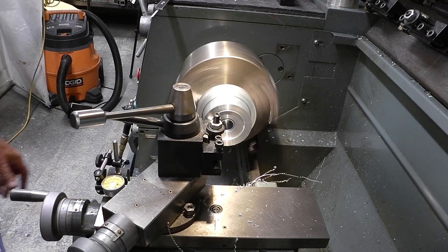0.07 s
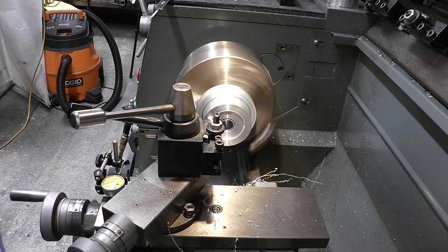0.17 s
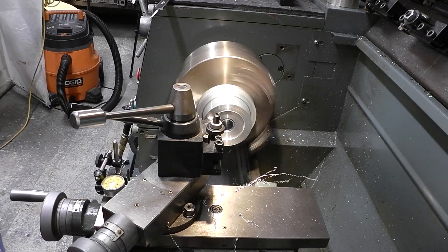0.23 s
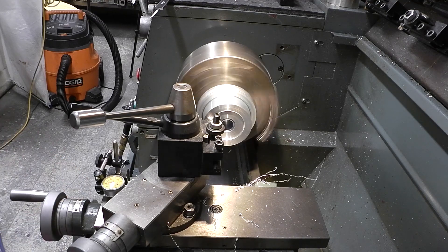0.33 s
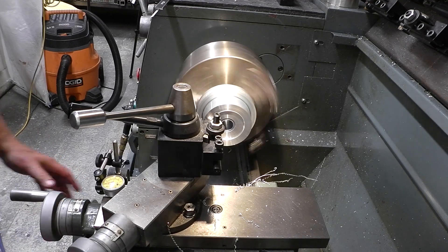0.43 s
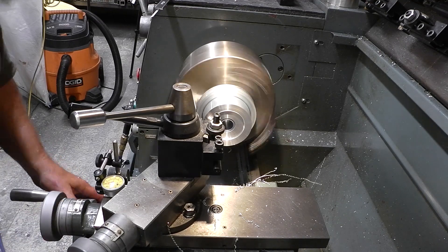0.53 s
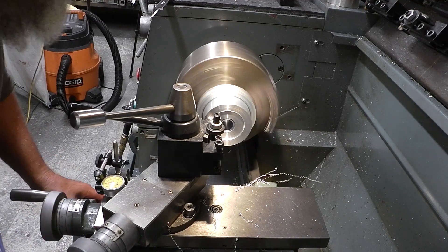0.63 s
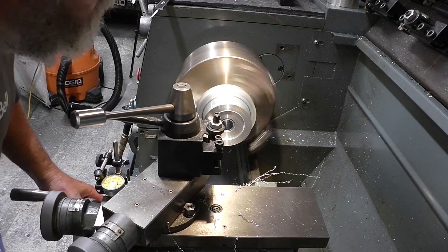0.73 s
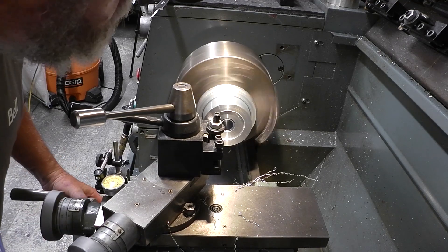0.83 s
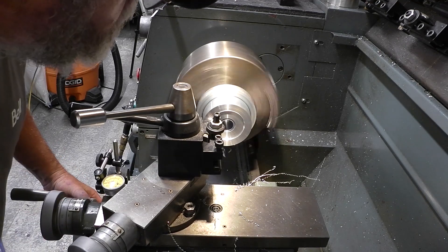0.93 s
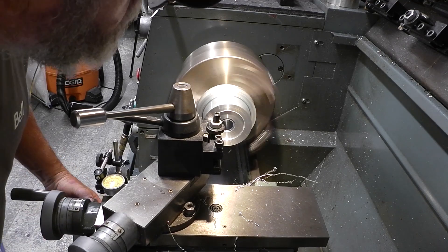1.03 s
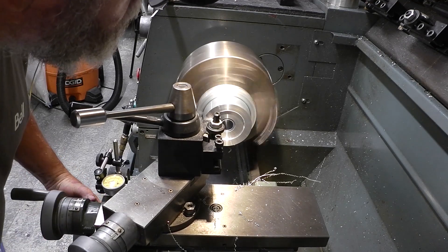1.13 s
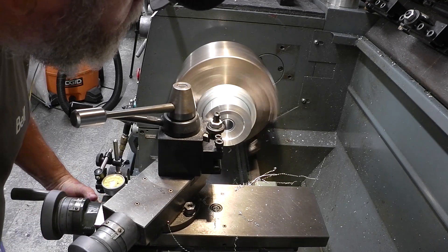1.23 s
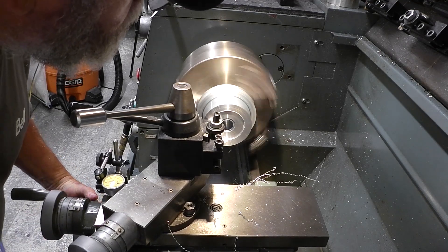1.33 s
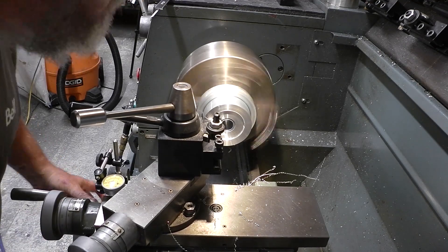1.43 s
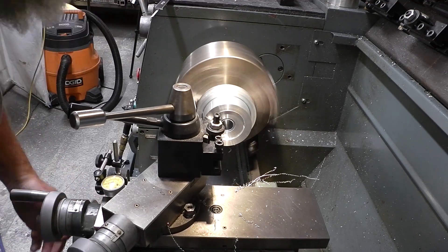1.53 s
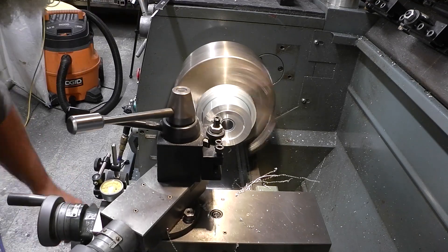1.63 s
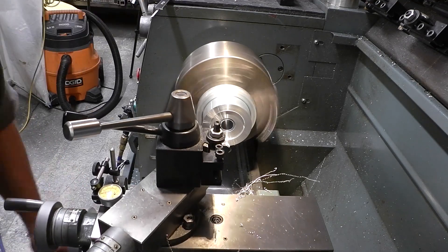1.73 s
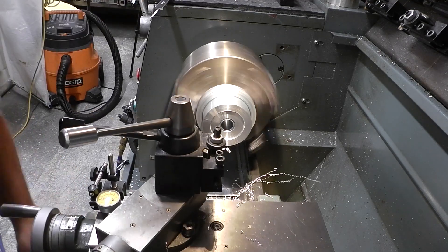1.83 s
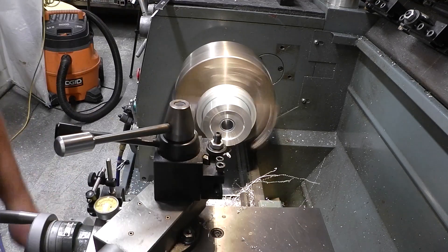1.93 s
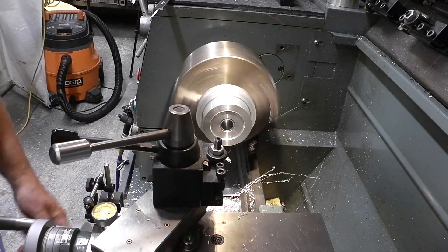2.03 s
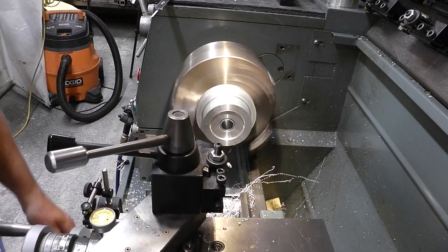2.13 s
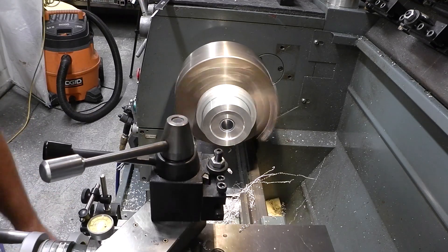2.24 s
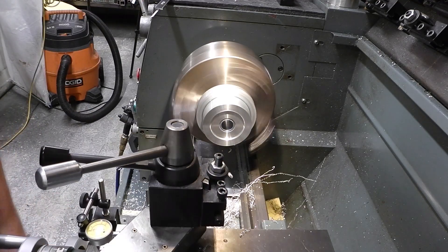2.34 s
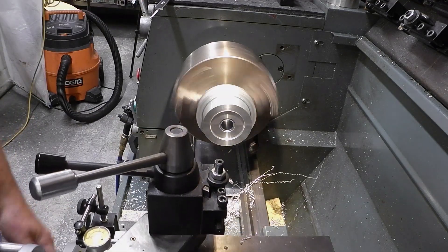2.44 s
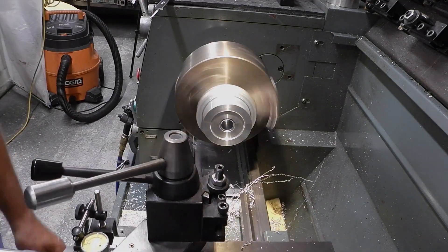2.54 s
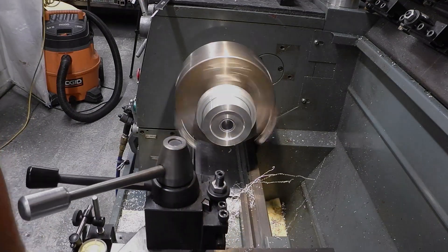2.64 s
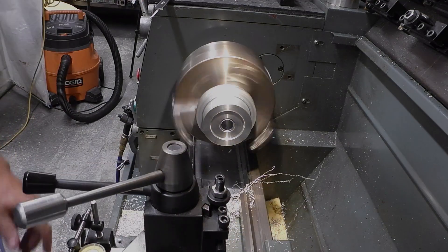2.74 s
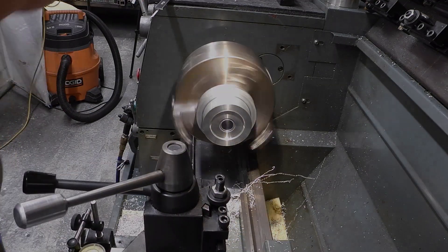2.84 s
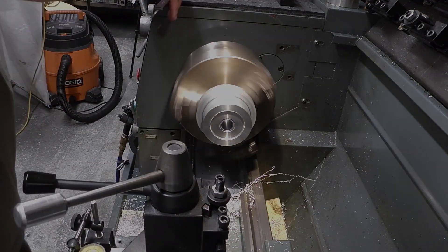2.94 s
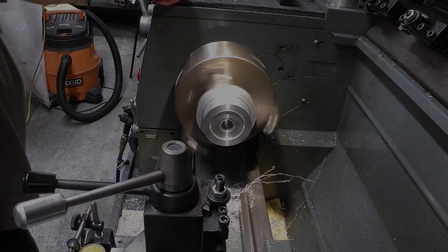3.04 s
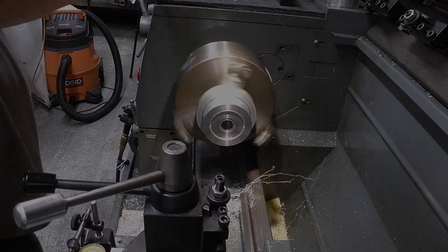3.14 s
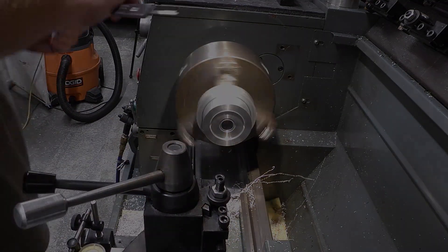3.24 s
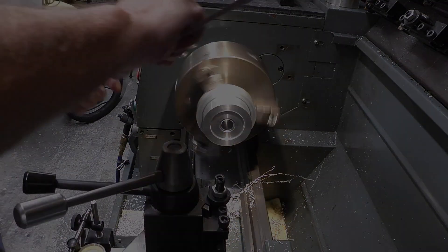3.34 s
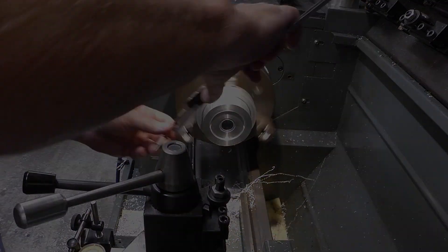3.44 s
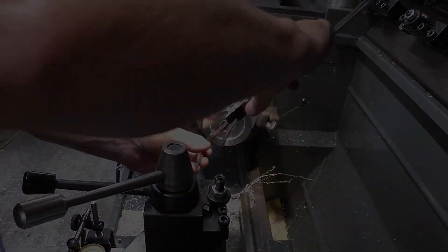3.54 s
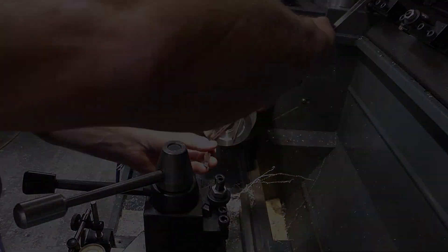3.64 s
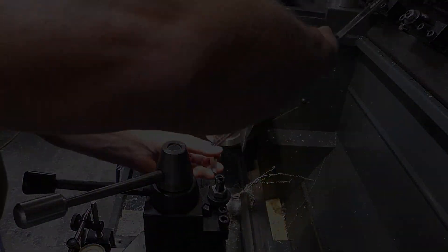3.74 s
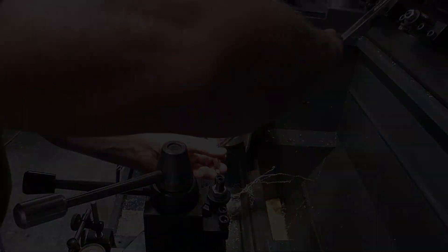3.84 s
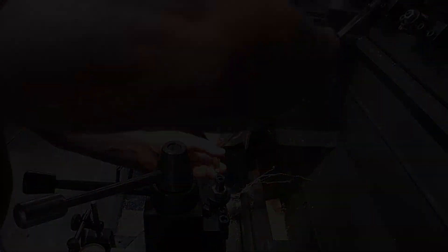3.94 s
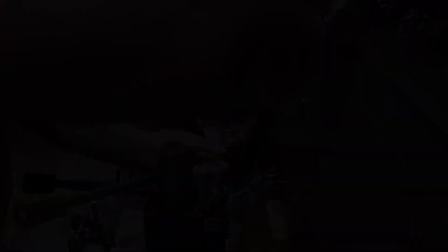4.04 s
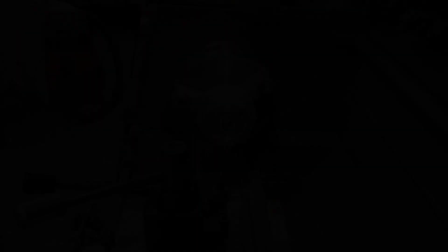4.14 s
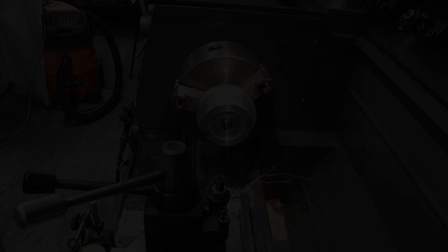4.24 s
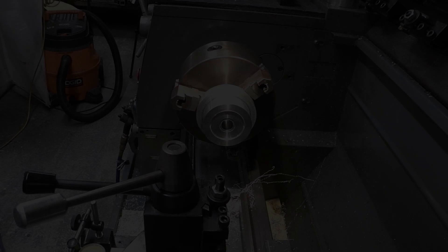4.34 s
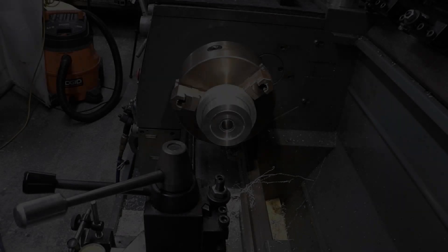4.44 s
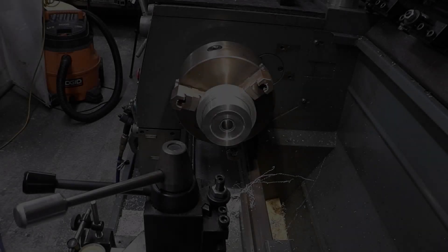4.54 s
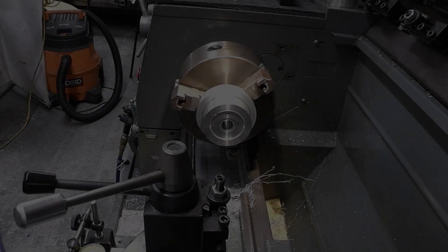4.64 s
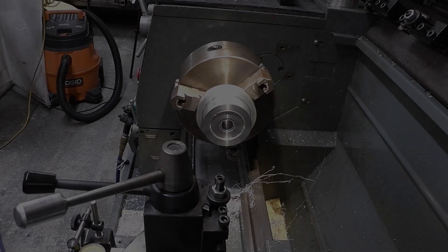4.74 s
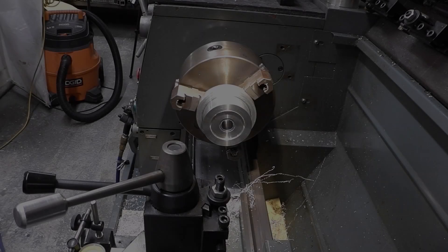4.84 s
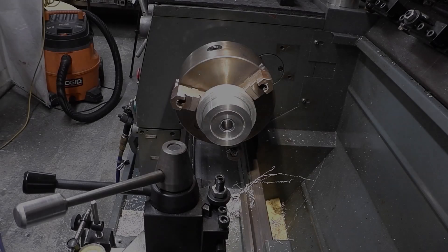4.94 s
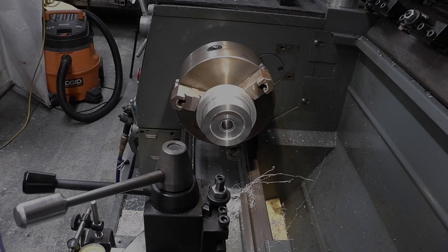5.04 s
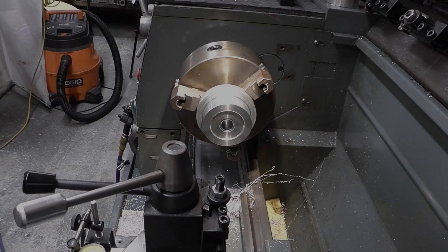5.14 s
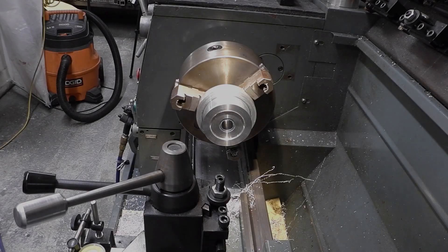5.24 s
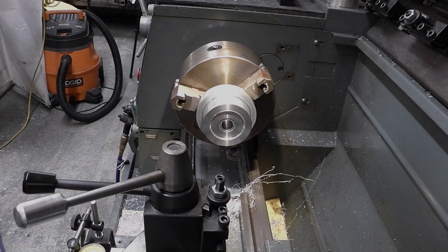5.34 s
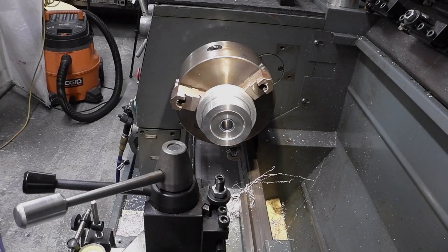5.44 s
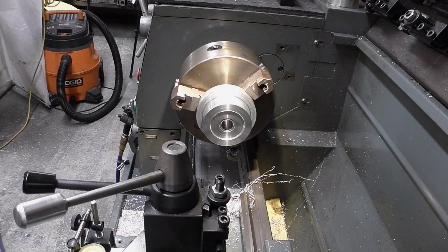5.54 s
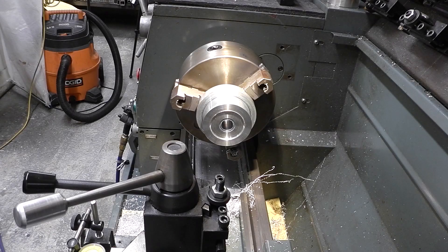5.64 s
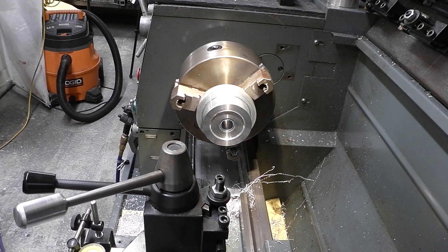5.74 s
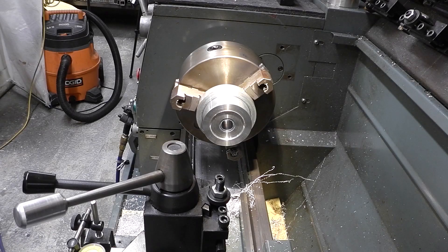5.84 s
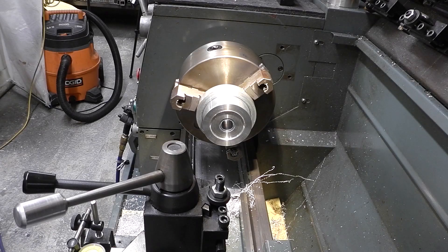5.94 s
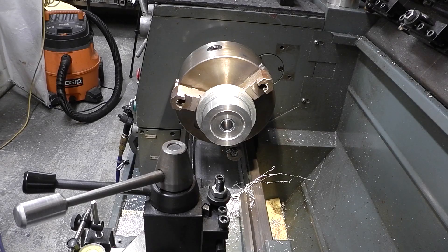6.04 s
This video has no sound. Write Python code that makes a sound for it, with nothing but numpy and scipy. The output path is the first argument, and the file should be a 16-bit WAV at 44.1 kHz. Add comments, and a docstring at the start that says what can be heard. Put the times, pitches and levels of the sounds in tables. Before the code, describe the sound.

Lathe spindle rumbles, controls click, the feed clunks in, then steady hissing, whining cutting of aluminium fades out; steel parts clink and knock in a quiet shop.

```python
"""A boring bar cuts aluminium on a lathe: uneven slips of the chip hiss through the bar's resonances,
and wavering tones whine over the hiss. Before the cut, the spindle rumbles as filtered noise, a handle rubs,
controls click, and the feed engages with a clunk and a rising whirr. The lathe then fades away.
A quiet workshop of noise and mains hum fades in, and steel parts knock with clinks and heavy thuds."""
import sys
import numpy as np
from scipy import signal
from scipy.fft import rfft, irfft, next_fast_len
from scipy.io import wavfile
from scipy.ndimage import map_coordinates

SR = 44100
rng = np.random.default_rng(int(sys.argv[2]) if len(sys.argv) > 2 else 0)


def transcribe(u):
    """Save the signal u as a 16-bit wav file named by the first command-line argument.

    u: samples, shape (n,) or (channels, n), limited to [-1, 1]; the rate is SR.
    q: integer samples, one column per channel.
    """
    v = np.clip(np.atleast_2d(u).T, -1, 1)
    q = np.round(v * 32767).astype(np.int16)
    wavfile.write(sys.argv[1], SR, q)


N = 268693
TIME = np.arange(N) / SR  # seconds
ENGAGE_S = 0.563  # the feed engages


def amp(db):
    """Turns decibels into a gain."""
    return 10 ** (np.asarray(db) / 20)


def unit(x):
    """Scales a sound to an rms of 1."""
    return x / np.sqrt(np.mean(x ** 2) + 1e-20)


def along(points, hz):
    """Reads a curve of (pitch_hz, value) points, joined on a log pitch axis."""
    f, v = np.transpose(points)
    return np.interp(np.log(hz + 1), np.log(f + 1), v)


def over_time(points):
    """Reads a curve of (time_s, value) points at every sample."""
    s, v = np.transpose(points)
    return np.interp(TIME, s, v)


def ramp(start, length):
    """Rises from 0 to 1 over length seconds, then holds."""
    return np.clip((TIME - start) / length, 0, 1)


def wobble(rate):
    """A smooth random curve through rate new values a second."""
    knots = rng.standard_normal(int(N * rate / SR) + 4)
    return map_coordinates(knots, [TIME * rate])


def ripple(hz, spacing_hz):
    """Random peaks and notches along frequency, as closely spaced resonances give."""
    return map_coordinates(rng.standard_normal(1024), [hz / spacing_hz], mode="mirror")


def noise(colour_db, alike, size=N):
    """Stereo noise of rms 1, coloured by a function of frequency; alike sets how much left matches right."""
    m = next_fast_len(size)
    hz = np.fft.rfftfreq(m, 1 / SR)
    # share the noise between the middle and the sides to get the wanted likeness
    turn = np.arccos(np.clip(along(alike, hz), -1, 1)) / 2
    spectra = rfft(rng.standard_normal((2, m))) * amp(colour_db(hz))
    mid, side = irfft(spectra * [np.cos(turn), np.sin(turn)], m)[:, :size]
    return unit(np.array([mid + side, mid - side]))


def rush(spectrum, alike, size=N):
    """Stereo noise of rms 1, coloured by a table of frequencies and dB."""
    return noise(lambda hz: along(spectrum, hz), alike, size)


def tones(lines, flutter, drift, rate):
    """Adds steady tones, each wavering in strength (flutter) and phase (drift, radians) on its own."""
    knots = np.arange(int(N * rate / SR) + 2) / rate

    def waver():
        return np.interp(TIME, knots, rng.standard_normal(len(knots)))

    total = np.zeros(N)
    for hz, db in lines:
        strength = 1 + flutter * waver()
        wave = np.sin(2 * np.pi * hz * TIME + drift * waver())
        total += amp(db) * unit(strength * wave)
    return total


def blow(rise, t60):
    """One second of loudness shape: a smooth rise to 1, then a fall of 60 dB every t60 seconds."""
    t = TIME[:SR]
    attack = np.sin(np.pi / 2 * np.minimum(t / rise, 1)) ** 2
    return attack * amp(-60 * np.maximum(t - rise, 0) / t60)


def ring(modes, rise, scatter_db):
    """Adds dying tones, as struck metal rings, with new random strengths for each blow."""
    total = np.zeros(SR)
    for hz, db, t60 in modes:
        strength = amp(db + scatter_db * rng.normal())
        wave = np.sqrt(2) * np.sin(2 * np.pi * (hz * TIME[:SR] + rng.random()))
        total += strength * blow(rise, t60) * wave
    return total


def damped(x, treble_loss):
    """A ring whose treble dies first; treble_loss is the extra dB a second at 10 kHz."""
    hz, t, z = signal.stft(x, SR, nperseg=128)
    loss_db = treble_loss * t * (hz[:, None] / 1e4) ** 2
    return signal.istft(z * amp(-loss_db), SR, nperseg=128)[1]


def add(track, s, sound):
    """Mixes a sound into the track at s seconds."""
    part = track[:, round(s * SR):][:, :sound.shape[-1]]
    part += sound[..., :part.shape[-1]]


# colour of the quiet workshop: pitch_hz, strength_db (per Hz, relative)
SHOP_COLOUR = [(30, -11), (55, -4), (85, -6.5), (115, 5), (155, -9), (200, 0), (260, -9), (500, -12),
               (1300, -15.5), (2000, -16.5), (6500, -19), (11000, -24), (15000, -31)]
# the mains hum: pitch_hz, level_db (rms)
MAINS_HUM = [(100, -78), (199, -74.5)]
# how alike left and right are in the shop, also for the jolt and knocks: pitch_hz, likeness (1 = same)
SHOP_LIKENESS = [(120, 0.9), (300, 0.82), (1000, .95), (2200, 0.91), (4200, 0.79), (7500, 0.43),
                 (11000, -0.13)]


def workshop(level_db=-64):
    """Room rumble as uneven noise, with a mains hum that comes and goes."""
    hum = unit(amp(3 * wobble(11))) * tones(MAINS_HUM, flutter=0.6, drift=0.9, rate=18)
    return amp(level_db + 0.67 * wobble(8.7)) * rush(SHOP_COLOUR, SHOP_LIKENESS) + hum


# steel parts knock on the machine: start_s, level_db, clink_db and thud_db (both relative to level_db),
# contact_s (how long the touch lasts), tilt_db (treble per octave)
KNOCK_LIST = [(4.475, -70, -7, -24, .014, 2), (4.634, -59, -7, -26.5, 0.027, 2),
              (4.913, -64, 2.5, -23, 0.0016, 0.5), (4.933, -59.5, 3, -31.5, 0.0047, 11),
              (4.939, -53, 5, -27, 0.00071, -2), (5.053, -38.5, 4.5, -26, .007, 1),
              (5.238, -45.5, 5.5, -6, 0.0093, -1.5), (5.285, -36, 6, -9.5, .004, 12.5),
              (5.325, -35.5, -1, -6, .01, 10.5), (5.380, -46, 3.5, -4, .012, 5.5),
              (5.666, -57.5, -9.5, -9, .0008, -10), (5.742, -59.5, -4, -17, 0.006, -3),
              (5.836, -57, -3, -18, .022, -5)]
# the bright ring of a part: pitch_hz, strength_db (per Hz, relative)
CLINK_COLOUR = [(2500, -24), (3700, -11), (4400, 0), (5050, 0.5), (5600, -1.5), (6400, 0), (7200, -1.5),
                (7700, -1), (8800, -1), (9800, -3.5), (11000, -3), (13000, -10.5), (15800, -14.5)]
# the slower answer of the machine's casing: pitch_hz, strength_db (per Hz, relative)
CASING_COLOUR = [(300, -23), (570, -7.5), (900, 0.5), (1400, 3), (1700, 3.5), (2100, -0.5), (2500, 2),
                 (3100, -4.5), (3800, -1), (4300, -14.5), (7000, -26)]
# the heavy bed and chip pan: pitch_hz, strength_db (per Hz, relative)
THUD_COLOUR = [(50, -44), (110, -11.5), (170, -26), (260, -8.5), (330, -4), (480, -1), (700, -5),
               (1200, -4), (2500, -27.5)]
# tones the machine rings with, before tilt and scatter: pitch_hz, level_db (relative to the thud), t60_s
MACHINE_MODES = [(310, -10, .45), (340, -12, .45), (372, -11, .45), (478, -15, .5), (900, -14, .35),
                 (958, -7, .36), (2223, -12, .35), (3690, -11, .28), (3788, -9, .28)]
CLINK_T60_S, CASING_T60_S, FULL_BLOW_DB = 0.54, 0.56, -40.5  # ring times after a full blow of this level
CLINK_HALVING_DB, CASING_HALVING_DB = 46, 71  # a blow lighter by this much rings half as long
GLANCE_S = 0.0045  # touches briefer than this only glance off and ring shorter


def knocks(casing_lag=0.018, thud_lag=0.026, ripple_db=3):
    """Bending waves run faster when high: the clink comes first, the casing and the bed follow."""
    out = np.zeros((2, N))

    def octaves(hz):
        return np.log2(np.clip(hz, 600, 4500) / 600)

    for s, db, clink_db, thud_db, rise, tilt_db in KNOCK_LIST:
        firmness = min(rise / GLANCE_S, 1)
        force_db = db - FULL_BLOW_DB
        clink_t60 = CLINK_T60_S * firmness * 2 ** (force_db / CLINK_HALVING_DB)
        casing_t60 = CASING_T60_S * firmness ** 0.13 * 2 ** (force_db / CASING_HALVING_DB)

        # each point of contact favours other resonances
        def clink_colour(hz):
            return along(CLINK_COLOUR, hz) + ripple_db * ripple(hz, spacing_hz=170.1)

        clink = blow(rise, clink_t60) * noise(clink_colour, SHOP_LIKENESS, size=SR)
        add(out, s, amp(db + clink_db) * damped(clink, treble_loss=18))

        # the tilt makes the casing brighter or darker
        def casing_colour(hz):
            return along(CASING_COLOUR, hz) + tilt_db * octaves(hz) + ripple_db * ripple(hz, spacing_hz=90.2)

        casing = blow(rise * 1.48, casing_t60) * noise(casing_colour, SHOP_LIKENESS, size=SR)
        add(out, s + casing_lag, amp(db) * casing)

        # a downward tilt also weakens the high modes
        modes = [(hz, level + min(tilt_db, 0) * octaves(hz), t60) for hz, level, t60 in MACHINE_MODES]
        bed = blow(rise + 0.022, casing_t60) * rush(THUD_COLOUR, SHOP_LIKENESS, size=SR)
        add(out, s + thud_lag, amp(db + thud_db) * (bed + ring(modes, rise=0.017, scatter_db=6.0)))
    # loose parts chatter as they ring
    return out * amp(0.43 * wobble(280))


# colour of the free-running spindle: pitch_hz, strength_db (per Hz, relative)
SPINDLE_COLOUR = [(30, -22), (100, -12.5), (170, -2.5), (250, -1), (350, 7.5), (480, -6.5), (640, 0),
                  (900, -14), (1900, -8), (3400, -16.5), (6000, -20.5), (10000, -17), (15000, -19)]
# the spindle's level before its unevenness: time_s, level_db
SPINDLE_LEVEL = [(0, -70), (.5, -64), (1, -67)]
# how alike left and right are for spindle, controls and cut: pitch_hz, likeness (1 = same)
LATHE_LIKENESS = [(120, 0.34), (260, 0.68), (500, 0.84), (1000, 0.81), (2000, 0.89), (4200, 0.93),
                  (7500, 0.9), (12000, 0.77)]


def spindle():
    """Bearings and belt rumble unevenly, as coloured noise of wavering level."""
    level_db = over_time(SPINDLE_LEVEL) + 1.2 * wobble(12)
    return amp(level_db) * rush(SPINDLE_COLOUR, LATHE_LIKENESS)


# colour of the steel controls, for the rub and the clicks: pitch_hz, strength_db (per Hz, relative)
STEEL_COLOUR = [(400, -14), (900, -5), (2300, -4), (3300, -6.5), (4500, -3.5), (6500, -5.5), (7900, 5),
                (9300, -1.5), (10500, -2.5), (13000, -7), (15800, -5.5)]
SLIDE_S, SLIDE_HOLD_S, SLIDE_DB = 0.18, 0.059, -54  # start, time until the decay begins, level
SLIDE_RISE_S, SLIDE_T60_S = 0.018, 0.25


def slide(grain_db=2):
    """A handle rubs briefly in fine slips as it is gripped, through the same steel as the clicks."""
    release = amp(-60 * np.maximum(TIME - SLIDE_S - SLIDE_HOLD_S, 0) / SLIDE_T60_S)
    slips = unit(amp(grain_db * wobble(430)) * rush(STEEL_COLOUR, LATHE_LIKENESS))
    return amp(SLIDE_DB) * ramp(SLIDE_S, SLIDE_RISE_S) * release * slips


# light clicks at the controls, the last ones as the feed lever closes: start_s, level_db, t60_s
CONTROL_CLICKS = [(.069, -55.5, .04), (.091, -53.5, 0.021), (0.13, -62, 0.023), (.219, -45.5, 0.018),
                  (.237, -49.5, .05), (.321, -56, .016), (.327, -50.5, 0.047), (.402, -46, 0.0099),
                  (0.408, -46, 0.059), (.478, -57.5, .04), (.525, -48, 0.026), (0.557, -47.5, 0.24),
                  (.567, -34.5, 0.046)]


def controls(echo_db=-17, echo_t60=0.12, ripple_db=3):
    """Small steel contacts, each with its own resonances and a short answer from the room."""
    out = np.zeros((2, N))

    def steel_colour(hz):
        return along(STEEL_COLOUR, hz) + ripple_db * ripple(hz, spacing_hz=360)

    for s, db, t60 in CONTROL_CLICKS:
        echo = amp(echo_db) * blow(0.016, echo_t60)
        shape = np.hypot(blow(0.0015, t60), echo)  # the click rises in 1.5 ms
        add(out, s, amp(db) * shape * noise(steel_colour, LATHE_LIKENESS, size=SR))
    return out


# the carriage jolts as the feed takes up, band by band: delay_s, pitch_hz, width_hz, level_db, t60_s
JOLT_BANDS = [(0.011, 260, 130, -51, 0.18), (0.0031, 700, 300, -45.5, 0.15), (0.0071, 1690, 790, -42, 0.19),
              (0.022, 2900, 1200, -40.5, 0.22)]
# tones the bar rings with as it enters the cut, before scatter: pitch_hz, level_db, t60_s
ENTRY_MODES = [(3685, -32, .075), (2920, -42, .15)]
MESH_START_HZ, MESH_CLIMB_HZ_PER_S, MESH_TOP_HZ = 400, 5400, 1720  # gear mesh as the drive gathers speed
WHIRR_DB, WHIRR_PEAK_S, WHIRR_WIDTH_S = -50, 0.742, 0.067  # loudest part of the way up


def engage():
    """The carriage jolts, the bar rings as it meets the metal, and the gears whirr up to speed."""
    out = np.zeros((2, N))
    for delay, centre, width, db, t60 in JOLT_BANDS:
        def band_colour(hz):
            offset = (hz ** 2 - centre ** 2) / (width * (hz + 1))
            return -20 * np.log10(1 + offset ** 2)

        band = noise(band_colour, SHOP_LIKENESS, size=SR)
        add(out, ENGAGE_S + delay, amp(db) * blow(0.0022, t60) * band)
    add(out, ENGAGE_S + 0.023, ring(ENTRY_MODES, rise=0.0089, scatter_db=1.0))

    mesh_hz = np.clip(MESH_START_HZ + MESH_CLIMB_HZ_PER_S * (TIME - ENGAGE_S), MESH_START_HZ, MESH_TOP_HZ)
    mesh = np.cos(2 * np.pi * np.cumsum(mesh_hz) / SR)
    swell = np.exp(-((TIME - WHIRR_PEAK_S) / WHIRR_WIDTH_S) ** 2)
    # uneven tooth contacts smear the mesh tone into a broken band
    whirr = amp(4.0 * wobble(70)) * wobble(700) * mesh
    return out + amp(WHIRR_DB) * swell * unit(whirr)


# hiss of the shearing chip: pitch_hz, strength_db (per Hz, relative)
CHIP_COLOUR = [(60, -19.5), (190, -26.5), (330, -24), (500, -14.5), (900, -11), (1200, -12.5), (2300, -4.5),
               (3100, -5.5), (4100, -0.5), (5600, -0.5), (7500, -1), (10000, -1.5), (13000, -6),
               (15800, -10)]
# resonances of the bar and the bored part: pitch_hz, width_hz, boost_db
BAR_PEAKS = [(1190, 250, 6), (1496, 69, 9), (1830, 200, 5.5), (3630, 230, 7), (4390, 110, 7.5),
             (4980, 420, 8.5), (6150, 130, 4.5), (7140, 350, 5), (8660, 260, 4), (9520, 53, 6),
             (11450, 260, 3)]
# the bar's main bending mode, once the cut has settled: pitch_hz, level_db (rms)
SQUEAL_TONE = [(3684, -45.5)]
# weaker whines of bar and drive, at full chip once the cut has settled: pitch_hz, level_db (rms)
WHINE_TONES = [(1484, -67.5), (2189, -66), (2904, -65.5), (3503, -64.5), (3863, -71), (4377, -62.5),
               (4452, -63), (4526, -60), (5008, -57), (5253, -63.5), (5380, -69.5), (5936, -60.5),
               (6519, -59.5), (7005, -63.5), (7247, -70), (7424, -62), (8258, -65), (9432, -63),
               (11284, -69)]
# rough tones of the bar before the cut settles: pitch_hz, level_db (rms)
CHATTER_TONES = [(1860, -54.5), (3214, -50.5), (3620, -51), (3712, -47.5)]
# the drive's hum: pitch_hz, level_db (rms)
DRIVE_HUM = [(390, -61), (780, -73.5), (1170, -71.5), (1560, -68)]
BITE_S, BITE_DB = 0.14, 21  # the chip thickens for this long after the feed engages; its hiss grows this much
CONTACT_S, SETTLE_S = 0.585, 0.775  # the bar meets the metal; its chatter gives way to a whine
SWITCH_S = 0.0088  # time either change takes
EARLY_WHINE = 0.65  # share of the whine that already sounds during the chatter


def boring(hiss_db=-40.5, grain_db=1.0, ripple_db=2.5):
    """The chip shears in tiny uneven slips, heard through the bar's resonances; bar and drive sing over it."""
    cutting, settled = ramp(CONTACT_S, SWITCH_S), ramp(SETTLE_S, SWITCH_S)
    chip_db = BITE_DB * (ramp(ENGAGE_S, BITE_S) - 1)

    def chip_colour(hz):
        peaks = sum(db / (1 + (2 * (hz - centre) / width) ** 2) for centre, width, db in BAR_PEAKS)
        return along(CHIP_COLOUR, hz) + peaks + ripple_db * ripple(hz, spacing_hz=45.29)

    slips = amp(grain_db * wobble(500) + 0.8 * wobble(24.64))
    hiss = amp(hiss_db + chip_db) * unit(slips * noise(chip_colour, LATHE_LIKENESS))

    squeal = tones(SQUEAL_TONE, flutter=0.063, drift=0.58, rate=16)
    # the weaker whines grow with the chip
    whine = squeal + amp(chip_db) * tones(WHINE_TONES, flutter=1.0, drift=0.85, rate=20)
    chatter = tones(CHATTER_TONES, flutter=0.5, drift=0.7, rate=90)
    singing = settled * whine + (1 - settled) * (chatter + EARLY_WHINE * whine)

    hum = ramp(ENGAGE_S, 0.015) * tones(DRIVE_HUM, flutter=0.14, drift=0.11, rate=6.3)
    return cutting * (hiss + singing) + hum


# the lathe fades away: time_s, gain
LATHE_GAIN = [(2.36, 0.87), (4.135, 0)]
# the workshop fades in: time_s, gain
SHOP_GAIN = [(4.16, 0.01), (5.6, 0.89)]


def scene():
    """The running lathe, a little to the right, gives way to the quiet shop and knocks a little to the left."""
    lathe = (spindle() + controls() + slide() + engage() + boring()) * amp([[-0.65], [0.65]])
    shop = over_time(SHOP_GAIN) * workshop()
    return over_time(LATHE_GAIN) * lathe + shop + knocks() * amp([[0.2], [-0.2]])


def record(dry):
    """Keeps nothing from 15.9 kHz upwards."""
    m = next_fast_len(N + SR // 2)
    kept = np.fft.rfftfreq(m, 1 / SR) < 15900
    return irfft(rfft(dry, m) * kept, m)[:, :N]


dry = scene()
out = record(dry)
transcribe(out)
```